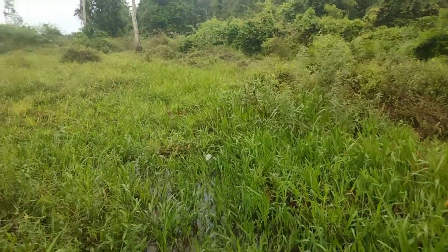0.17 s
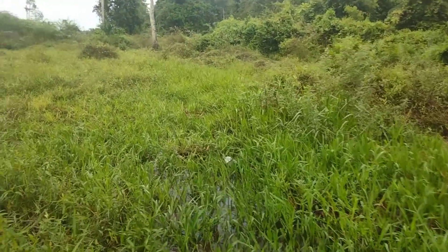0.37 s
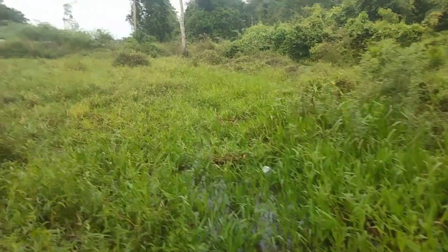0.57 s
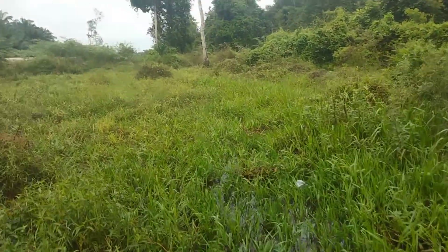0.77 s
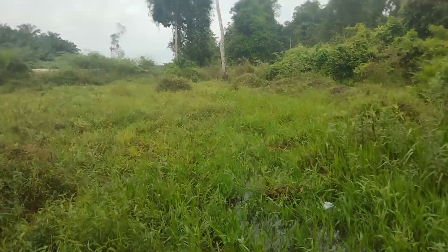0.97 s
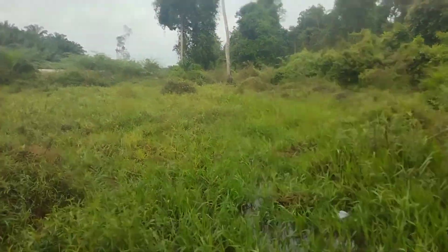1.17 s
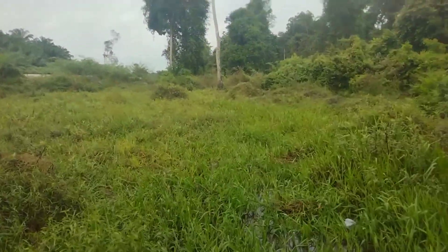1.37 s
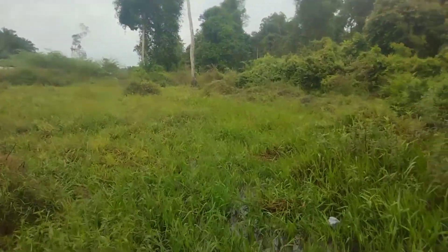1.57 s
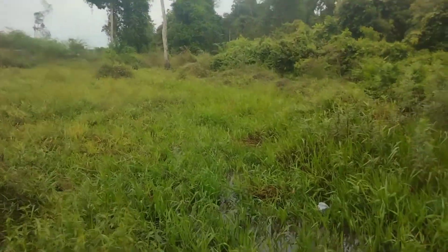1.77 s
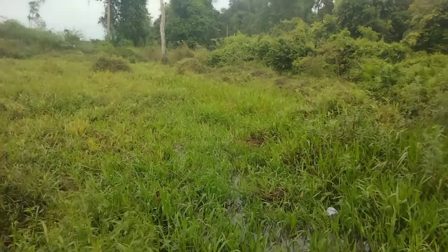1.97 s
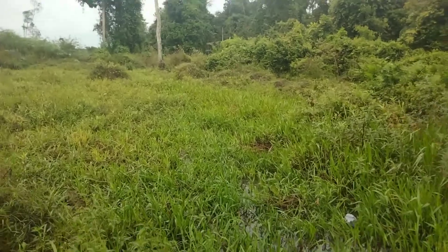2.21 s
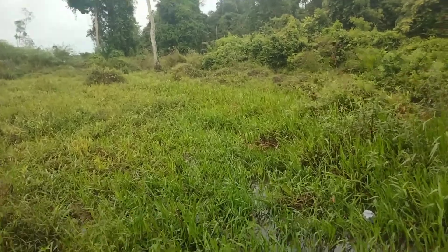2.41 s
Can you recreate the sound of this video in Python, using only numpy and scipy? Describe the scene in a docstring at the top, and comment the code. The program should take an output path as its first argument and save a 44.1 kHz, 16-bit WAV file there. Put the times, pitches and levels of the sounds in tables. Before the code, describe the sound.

A frog close by gives four short rattling croaks, then a fainter one answers three times

```python
"""A wet meadow: a frog close by gives four short rattling croaks and a farther frog answers three times.
Each croak is a train of glottal clicks that ring the resonances of the vocal sac.
Wet grass crackles, swishes and rustles near the microphone, all made of tiny random clicks.
Drips, stem snaps, blade ticks and chirps are short tones; throbbing bands of noise give distant frogs
and the lingering tails of the farther frog's calls, over a patchy noise bed of air and insects."""
import sys
import numpy as np
from scipy import signal
from scipy.fft import rfft, irfft
from scipy.io import wavfile
from scipy.ndimage import uniform_filter1d

SR = 44100
rng = np.random.default_rng(int(sys.argv[2]) if len(sys.argv) > 2 else 0)


def to_wav(s):
    """Save 16-bit WAV."""
    ch = np.atleast_2d(s).T  # columns
    pcm = np.round(np.clip(ch, -1, 1) * 32767)  # PCM
    wavfile.write(sys.argv[1], SR, pcm.astype(np.int16))


def convert_level_to_amplitude(level_db):
    """Map a level in decibels to its linear amplitude factor."""
    exponent = np.asarray(level_db, float) / 20
    return 10 ** exponent


N = 108045  # length in samples

# Pulse timing of the croaks. Each row: start in seconds, time until it tires in seconds,
# longest pulse gap in seconds, settling time of the gaps in seconds.
NEAR_TIMING = [(.1131, .0438, .00436, .0058), (.2913, .0237, .00519, .0053), (.4694, .0300, .00486, .0039),
               (.6589, .0199, .00532, .0066)]
FAR_TIMING = [(1.5347, .056, .00441, .0036), (1.7347, .0421, .00492, .0038), (1.9363, .0359, .00489, .0036)]
# Strength of the croaks. Each row: base level in dB, level offset at the start in dB,
# fade time once tired in seconds.
NEAR_EFFORT = [(-10.5, -8.5, 0.029), (-11, -2.5, 0.035), (-12.5, -2.5, 0.031), (-12, -3, .038)]
FAR_EFFORT = [(-30, -5.5, 0.019), (-29.5, -5.5, 0.034), (-34, 4, 0.038)]
# Vocal sac resonances. Each row: frequency in Hz, width in Hz, relative level in dB.
NEAR_SAC = [(1611, 260, -9), (2332, 460, -4), (3790, 280, 1.5), (4130, 860, -7.5), (4965, 970, -17.5)]
FAR_SAC = [(1739, 240, -14.5), (2400, 170, -9), (3080, 780, -9.5), (3524, 200, -4.5), (3820, 280, -35)]
# Tone colours of the grass layers. Each row: frequency in Hz, relative level in dB.
CRACKLE_COLOUR = [(59, -62), (100, -17), (415, -27.5), (470, -21), (495, -31), (906, -12), (1460, -5),
                  (2090, 8.5), (3150, -8.5), (7000, -32), (9100, -29), (15400, -120)]
SWISH_COLOUR = [(5000, -38), (5600, -7), (7000, -15), (8400, 11), (10400, -10.5), (12000, -3),
                (13500, -1.5), (15000, -4.5), (15700, 7), (16000, -43)]
RUSTLE_COLOUR = [(40, -72), (120, -18.5), (250, -3), (450, -1), (800, -0.5), (1300, -9.5), (3000, -91)]
# Loudness of the grass layers over time. Each row: time in seconds, level in dB.
CRACKLE_LEVEL = [(0, -47.5), (.2, -41.5), (.24, -39.5), (.4, -38.5), (.57, -43), (.66, -51), (.76, -38),
                 (.85, -56), (.99, -36.5), (1.1, -44), (1.19, -41), (1.25, -33.5), (1.31, -44.5),
                 (1.36, -38), (1.47, -49), (1.57, -44.5), (1.63, -46.5), (1.67, -39), (1.71, -43),
                 (1.76, -39), (1.84, -37.5), (1.89, -49), (1.96, -43.5), (2.1, -55.5), (2.17, -41),
                 (2.25, -51.5), (2.31, -44.5), (2.45, -52)]
SWISH_LEVEL = [(0.0, -57), (0.02, -47.5), (0.04, -56), (0.22, -50), (0.65, -63), (0.67, -90), (0.7, -67),
               (0.88, -76), (0.89, -54), (1.01, -48.5), (1.39, -59.5), (1.56, -60), (1.58, -61),
               (1.58, -53), (1.77, -52), (2.01, -68), (2.44, -65), (2.45, -66)]
RUSTLE_LEVEL = [(0.0, -51.5), (0.72, -60), (0.75, -50), (0.8, -65), (0.97, -53.5), (1.0, -49), (1.01, -52),
                (1.62, -62), (1.66, -49), (1.69, -63.5), (1.76, -54), (2.13, -67), (2.18, -62.5),
                (2.45, -57.5)]
# Low drips and knocks, then snaps of wet stems.
# Each row: start in seconds, envelope peak in dB, pitch in Hz, length in cycles.
DRIPS = [(0.122, -36, 1400, 2.3), (0.226, -32, 890, 1.7), (0.32, -56, 1390, 2.4), (0.43, -35.5, 1060, 6),
         (0.752, -43.5, 493, 4.1), (0.766, -31, 1230, 4), (0.911, -36, 1340, 1.4),
         (0.991, -27.5, 1020, 2.7), (1.244, -31, 1260, 1.4), (1.436, -35.5, 1250, 4.4),
         (1.545, -53, 1230, 1.6), (1.57, -34, 1180, 1.8), (1.593, -46, 1050, 2.8), (1.643, -37, 1410, 4.2),
         (1.656, -33, 1060, 3.7), (1.665, -33, 930, 3.3), (1.74, -36.5, 1070, 6), (1.926, -37.5, 1190, 2.0),
         (1.983, -44, 438, 4.3), (2.021, -34.5, 1460, 2.5), (2.162, -47, 400, 4.6), (2.229, -40, 600, 1.1)]
STEM_SNAPS = [(0.7487, -32, 2150, 13), (0.9148, -30.5, 2100, 6.0), (0.9477, -34, 1990, 5.1),
              (0.9772, -28.5, 1750, 6.0), (0.9814, -30, 1960, 13), (0.9934, -31, 2400, 6.6),
              (1.0425, -30, 2100, 11), (1.1268, -35, 2160, 3), (1.2176, -28.5, 2270, 6.9),
              (1.2406, -28.5, 2150, 17), (1.2714, -31, 2400, 16), (1.3049, -39, 2270, 16),
              (1.3384, -30.5, 2190, 14), (1.4401, -27.5, 2010, 5.5), (1.4484, -32, 2100, 11),
              (1.5479, -31, 2000, 4.5), (1.5663, -29, 2000, 9.8), (1.6447, -23.5, 2240, 6.4),
              (1.6656, -30, 2320, 18), (1.6916, -46, 2260, 8.7), (1.7414, -23.5, 2050, 5.5),
              (1.8304, -33, 2200, 5.6), (1.8367, -23.5, 2010, 2.2), (1.9285, -28, 1960, 4.4),
              (2.1615, -34, 2130, 5.2), (2.2303, -32.5, 1830, 3.5), (2.2987, -42, 1950, 2.8)]
# Bright ticks of blades. Each row: start in seconds, envelope peak in dB before the noise,
# pitch in Hz, length in cycles.
BLADE_TICKS = [(0.1231, -37, 12900, 60.0), (0.2299, -40, 15100, 60.0), (0.3012, -30, 15300, 60.0),
               (0.4589, -37, 12300, 67), (0.6684, -38, 15400, 67), (0.7672, -41, 12600, 66),
               (0.8934, -46, 15500, 60.0), (0.9492, -44, 14300, 60.0), (0.9941, -30, 13300, 73),
               (1.075, -36, 15200, 60.0), (1.4391, -51, 11200, 60.0), (1.5713, -31, 15500, 55),
               (1.6272, -36, 15400, 60.0), (1.696, -45, 15400, 60.0), (1.7729, -43, 15300, 60.0),
               (1.788, -35, 11650, 66), (1.938, -44, 15000, 60.0)]
# Small chirps. Each row: start in seconds, length in seconds, first and last pitch in Hz, peak in dB.
CHIRPS = [(.257, .004, 3200, 3200, -38), (1.05, .026, 4400, 4400, -46), (1.0755, .003, 4200, 3700, -32),
          (1.455, .009, 2200, 2700, -37), (1.48, .02, 3000, 1950, -40)]
# Faint throbbing bands around 3.8 kHz: distant frogs, and the lingering tails of the farther
# frog's calls. Each row: start in seconds, length in seconds, level in dB before the throb.
THROBS = [(.86, .09, -52), (1.6, .08, -50), (1.79, .07, -46), (2.0, .08, -55), (2.1, .12, -52),
          (2.3, .11, -50)]
# Tone colours of the bed. Each row: frequency in Hz, relative level in dB per Hz.
AIR_COLOUR = [(30, -25), (148, -0.5), (228, -6.5), (572, -5), (702, -48), (1010, -11.5), (1220, -8),
              (1650, 2), (2120, 6), (3000, -10.5), (3850, 3.5), (4250, -0.5), (4790, 0.5), (5050, -11.5),
              (5750, -40), (6300, -15), (7000, -16), (7400, -33)]
INSECT_COLOUR = [(4000, -40), (6800, -75), (7020, -19), (8100, 5), (9020, 1.5), (9730, -5.5), (10600, 1.5),
                 (10900, -12.5), (11500, -12.5), (13100, -65), (14900, -25), (15700, -47), (16000, -8)]


def evened(x):
    """Scales to rms 1."""
    return x / np.sqrt(np.mean(x ** 2) + 1e-20)


def read(points, hz):
    """Reads a tone colour in dB at given frequencies, along a log frequency axis."""
    table_hz, db = np.transpose(points)
    return np.interp(np.log(hz + 1), np.log(table_hz + 1), db)


def curve(points):
    """Turns a level table into a gain per sample."""
    seconds, db = np.transpose(points)
    return convert_level_to_amplitude(np.interp(np.arange(N) / SR, seconds, db))


def add(mix, start, sound):
    """Mixes a sound in at a time in seconds, cut off at the end of the mix."""
    part = mix[round(start * SR):][:len(sound)]
    part += sound[:len(part)]


def coloured(x, table):
    """Filters by a tone colour and scales to rms 1."""
    gain = convert_level_to_amplitude(read(table, np.fft.rfftfreq(len(x), 1 / SR)))
    return evened(irfft(rfft(x) * gain, len(x)))


def drift(seconds):
    """Slow random wander of rms 1: noise averaged twice over the given time."""
    width = round(seconds * SR)
    return evened(uniform_filter1d(uniform_filter1d(rng.standard_normal(N), width), width))


def grains(per_s, spread_db):
    """Sparse clicks at random times, of random sign and size."""
    struck = rng.random(N) < per_s / SR
    size_db = spread_db * np.minimum(rng.exponential(1, N), 4)
    return struck * rng.choice([-1, 1], N) * convert_level_to_amplitude(size_db)


def sac_click(sac, tiredness, detune):
    """One glottal click: every sac resonance swells softly and dies, duller and lower when tired."""
    ring = np.arange(300) / SR
    # the upper resonances are choked by 8 dB from about 1.9 ms on
    choke = convert_level_to_amplitude(-8 / (1 + (0.0019 / (ring + 1e-9)) ** 10))
    click = np.zeros(300)
    for k, (hz, width_hz, db) in enumerate(sac):
        octaves = np.log2(hz / sac[0][0])
        gain = (-1) ** k * convert_level_to_amplitude(db - 5.5 * tiredness * octaves)
        swell = np.pi * width_hz * ring * np.exp(1 - np.pi * width_hz * ring)
        if hz > 2000:  # the lowest resonance rings on
            swell = swell * choke
        tuned_hz = hz * (1 + 0.011 * detune[k] - 0.028 * tiredness ** 2)
        click += gain * swell * np.sin(2 * np.pi * tuned_hz * ring)
    return click


def croak(sac, tire_s, longest_gap, settle_s, db, start_db, fade_s):
    """A train of clicks whose gaps first widen, then shrink as the frog tires and fades."""
    out = np.zeros(SR // 5)
    t = 0.0
    for chance in rng.standard_normal((40, 8)):
        tired_s = max(t - tire_s, 0)
        tiredness = tired_s / fade_s
        if tired_s > 1.05 * fade_s:
            break
        warming_db = start_db * np.exp(-t / 0.049)
        pulse_db = db + warming_db - 9.5 * tiredness ** 3 + 0.7 * chance[0]
        jitter_s = 0.00006 * chance[1]
        add(out, abs(t + jitter_s), sac_click(sac, tiredness, chance[2:]) * convert_level_to_amplitude(pulse_db))
        gap = longest_gap * (1 - 0.59 * np.exp(-t / settle_s)) - 0.098 * tired_s
        shortest_gap = min(0.0027, 0.45 * longest_gap + t)
        t += max(gap, shortest_gap)
    return out


def frog(timing, effort, sac, wet_db, t60_s):
    """All croaks of one frog, with a decaying noise tail for scatter from grass and bushes."""
    direct = np.zeros(N)
    for (start, *pulses), push in zip(timing, effort):
        add(direct, start, croak(sac, *pulses, *push))
    t = np.arange(SR // 4) / SR
    tail = rng.standard_normal(len(t)) * convert_level_to_amplitude(-60 * t / t60_s) * (t > 0.002)
    scatter = signal.oaconvolve(direct, tail / np.linalg.norm(tail))[:N]
    return direct + convert_level_to_amplitude(wet_db) * scatter


def crackle(clumps):
    """Low treble crackle: eight sets of clicks, each smeared by its own short noise ring."""
    ring = np.exp(-np.arange(400) / SR / 0.0015)
    smeared = np.zeros(N)
    for _ in range(8):
        clicks = grains(2500 / 8, spread_db=3.0)
        smeared += signal.oaconvolve(clicks, ring * rng.standard_normal(400))[:N]
    return coloured(smeared * convert_level_to_amplitude(1.5 * clumps), CRACKLE_COLOUR) * curve(CRACKLE_LEVEL)


def swish():
    """Bright swish of blades: dense clicks that swell and sink at random."""
    clicks = grains(14000, spread_db=3.0) * convert_level_to_amplitude(1.8 * drift(0.0069))
    return coloured(clicks, SWISH_COLOUR) * curve(SWISH_LEVEL)


def low_rustle(clumps):
    """Low rustle: sparser clicks with the treble taken away."""
    clicks = grains(900, spread_db=4.0) * convert_level_to_amplitude(0.5 * clumps)
    return coloured(clicks, RUSTLE_COLOUR) * curve(RUSTLE_LEVEL)


def grass():
    """Wet grass: crackle and low rustle share their clumps, the swish wanders by itself."""
    clumps = drift(0.0086)
    return crackle(clumps) + swish() + low_rustle(clumps)


def blip(hz, cycles):
    """A tone under a quick rise and fall, peaking a quarter of the way into its cycles."""
    t = np.arange(900) / SR
    u = 4 * t * hz / max(cycles, 0.5)
    return u * np.exp(1 - u) * np.sin(2 * np.pi * hz * t)


def drips_and_snaps():
    """Single drips, knocks and stem snaps, each a briefly ringing tone."""
    out = np.zeros(N)
    for start, db, hz, cycles in DRIPS + STEM_SNAPS:
        add(out, start, convert_level_to_amplitude(db) * blip(hz, cycles))
    return out


def blade_ticks():
    """Scratchy bright ticks: a high tone spread by smoothed noise."""
    out = np.zeros(N)
    for start, db, hz, cycles in BLADE_TICKS:
        scratch = uniform_filter1d(rng.standard_normal(900), size=6)
        add(out, start, convert_level_to_amplitude(db) * blip(hz, cycles) * scratch)
    return out


def chirps():
    """Tiny tones, steady or gliding evenly in pitch, under a rounded envelope."""
    out = np.zeros(N)
    for start, length, first_hz, last_hz, db in CHIRPS:
        u = np.arange(0, length, 1 / SR) / length
        hz = first_hz * (last_hz / first_hz) ** u
        tone = np.sin(2 * np.pi * np.cumsum(hz) / SR)
        add(out, start, convert_level_to_amplitude(db) * np.sin(np.pi * u) ** 0.5 * tone)
    return out


def throbbing_bands():
    """Distant frogs and lingering call tails: noise around 3.8 kHz, throbbing 215 times a second."""
    hz, t = np.fft.rfftfreq(N, 1 / SR), np.arange(N) / SR
    resonance = np.exp(-((hz - 3800) / 300) ** 2)
    band = evened(irfft(rfft(rng.standard_normal(N)) * resonance, N))
    swell = np.zeros(N)
    for start, length, db in THROBS:
        swell += convert_level_to_amplitude(db) * np.sin(np.pi * np.clip((t - start) / length, 0, 1)) ** 0.5
    throb = 1 + 0.5 * np.sin(2 * np.pi * 215 * t)
    return band * swell * throb


def patchy(table, patch_db):
    """Noise of a tone colour whose level drifts in patches of time and pitch, at rms 1."""
    frames, hz = N // 128 + 5, np.fft.rfftfreq(512, 1 / SR)
    real, imaginary, patches = rng.standard_normal((frames, 257, 3)).T
    patches = uniform_filter1d(patches, size=5, axis=0)  # across pitch
    patches = evened(uniform_filter1d(patches, size=14, axis=1))  # across time
    gain = convert_level_to_amplitude(read(table, hz)[:, None] + patch_db * patches)
    spectrum = (real + 1j * imaginary) * gain
    return evened(signal.istft(spectrum, nperseg=512, noverlap=384)[1][:N])


def insects():
    """High insect hiss: patchy noise in several treble bands."""
    return convert_level_to_amplitude(-53.5) * patchy(INSECT_COLOUR, patch_db=2.5)


def air():
    """The broad bed of the meadow: patchy noise from the bass to the treble."""
    return convert_level_to_amplitude(-49.5) * patchy(AIR_COLOUR, patch_db=3.95)


def scene():
    """Both frogs, the grass with its small sounds, and the bed, in mono."""
    near_frog = frog(NEAR_TIMING, NEAR_EFFORT, NEAR_SAC, wet_db=-13.5, t60_s=0.1)
    far_frog = frog(FAR_TIMING, FAR_EFFORT, FAR_SAC, wet_db=-4, t60_s=0.18)
    small_sounds = drips_and_snaps() + blade_ticks() + chirps()
    background = throbbing_bands() + insects() + air()
    return (near_frog + far_frog + grass() + small_sounds + background)[None]


def roll_off(x):
    """The treble ends steeply here."""
    return signal.sosfilt(signal.butter(12, 16790, fs=SR, output="sos"), x)


def record(dry):
    """The microphone: bass rolls off below 57 Hz and the band ends at 15.8 kHz."""
    bass_cut = signal.butter(2, 57, "high", fs=SR, output="sos")
    top_cut = signal.firwin(511, 15800, window=("kaiser", 9), fs=SR)
    mix = signal.oaconvolve(signal.sosfilt(bass_cut, dry), top_cut[None], "same")
    return roll_off(mix)


dry = scene()
out = record(dry)
to_wav(out)
```